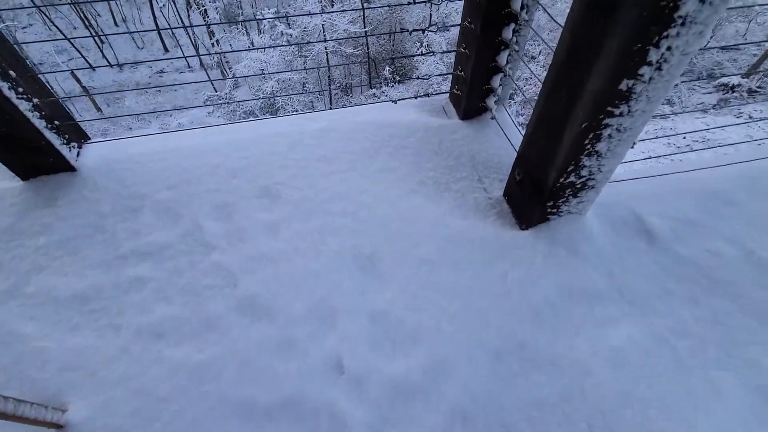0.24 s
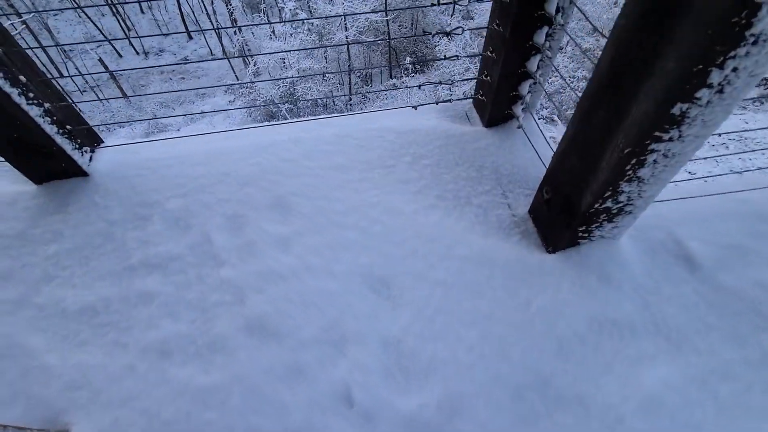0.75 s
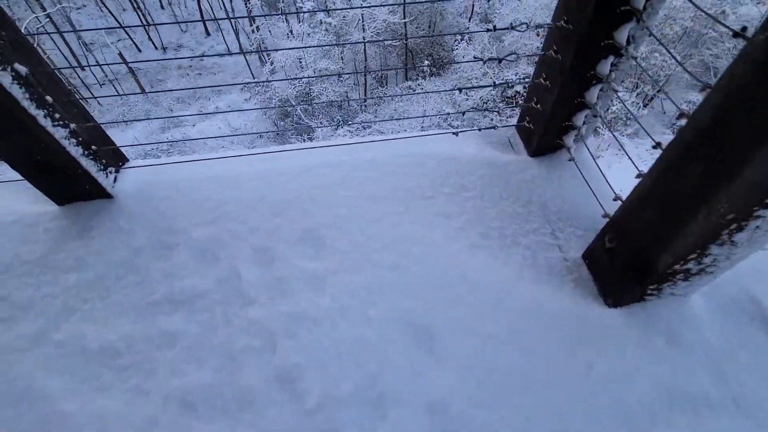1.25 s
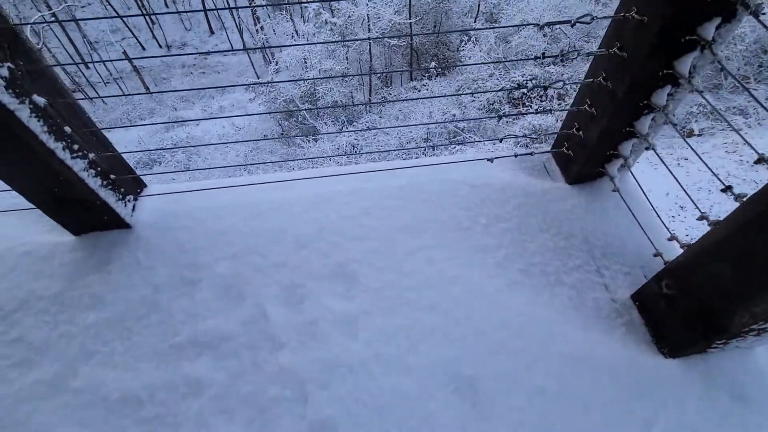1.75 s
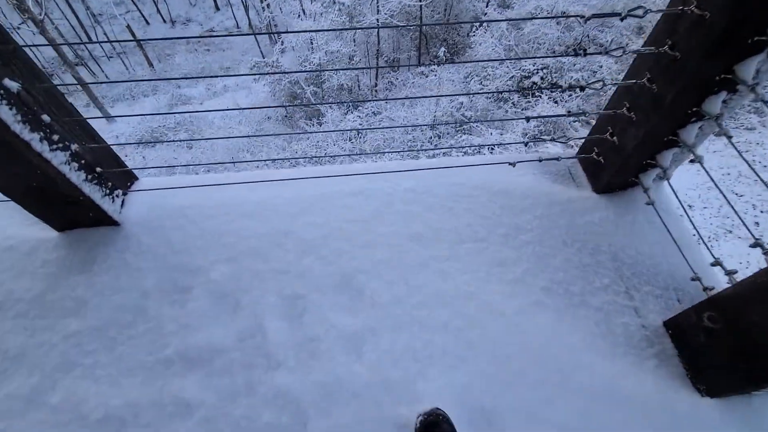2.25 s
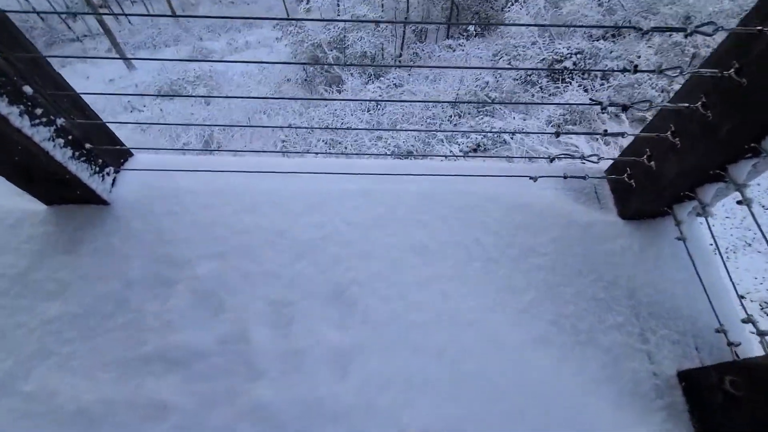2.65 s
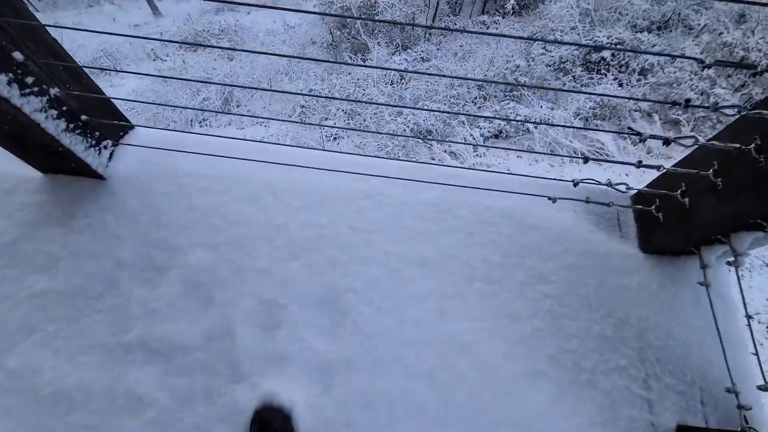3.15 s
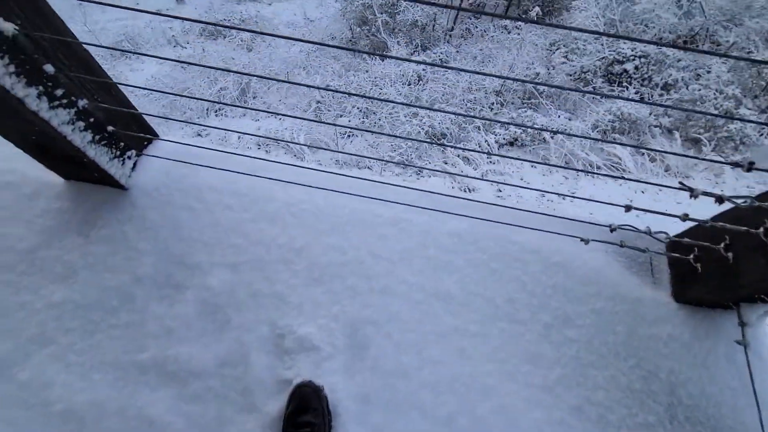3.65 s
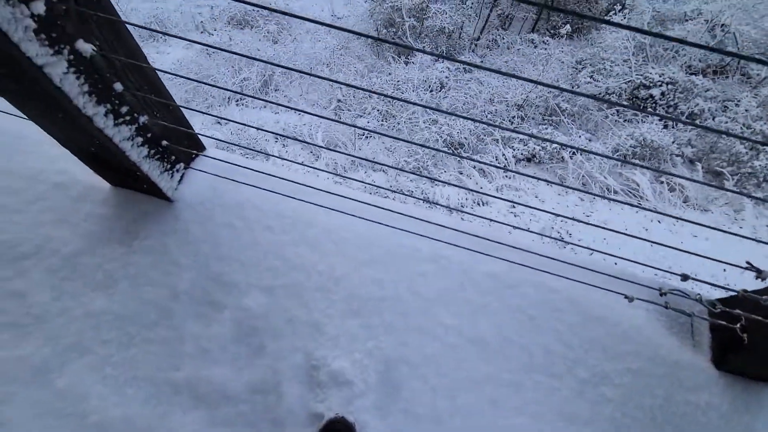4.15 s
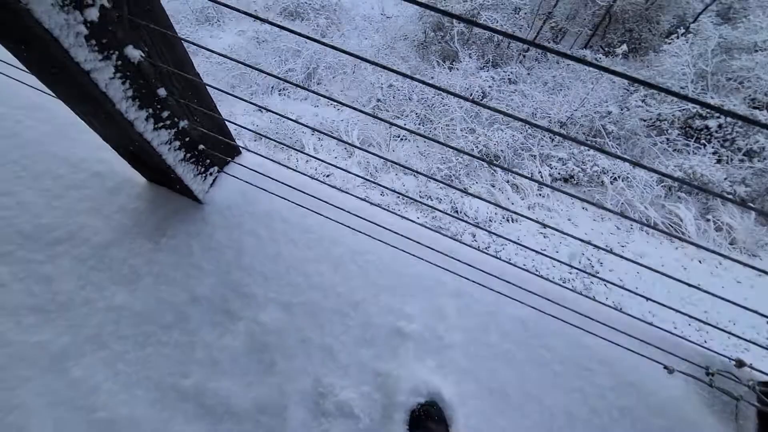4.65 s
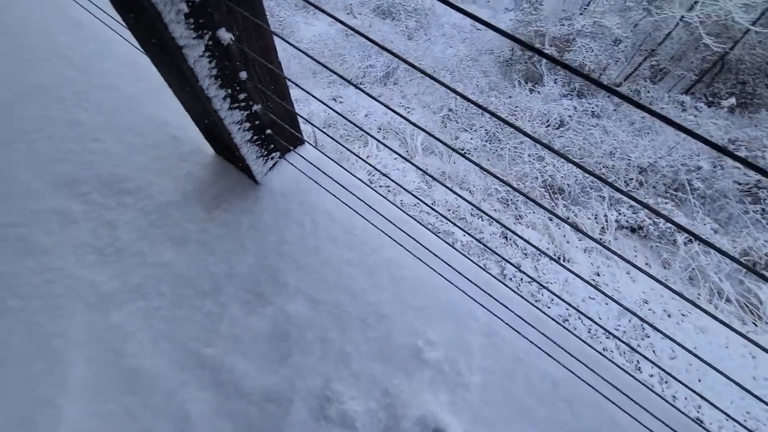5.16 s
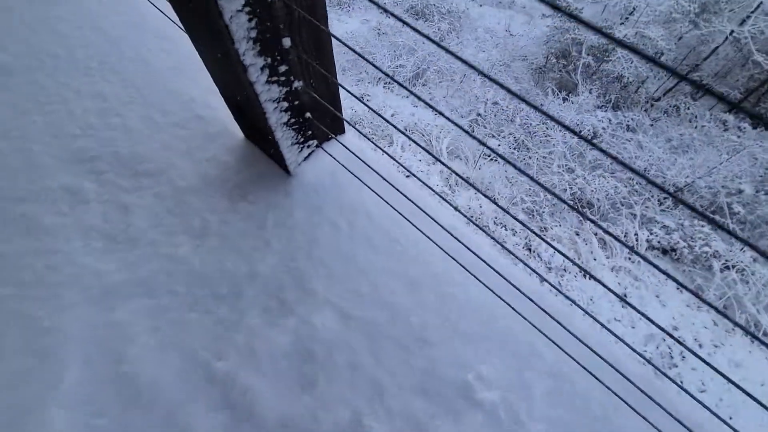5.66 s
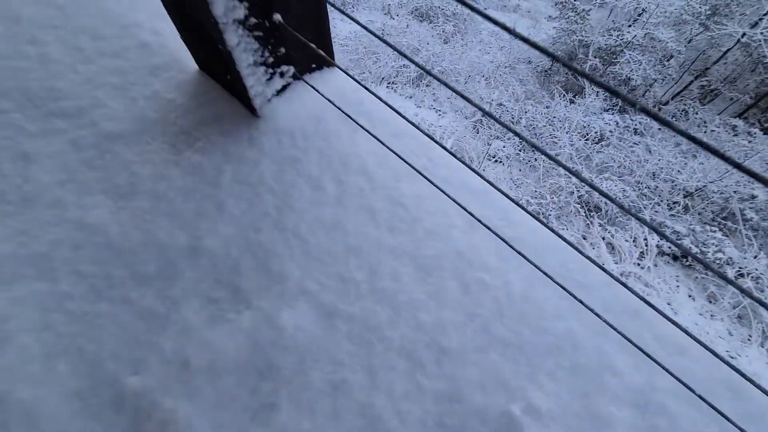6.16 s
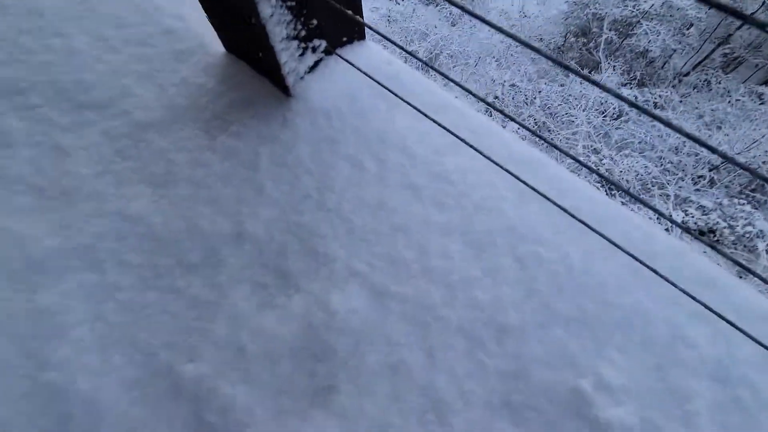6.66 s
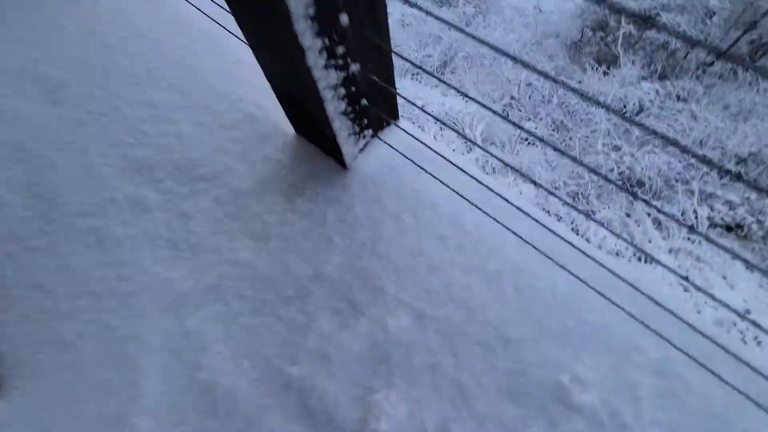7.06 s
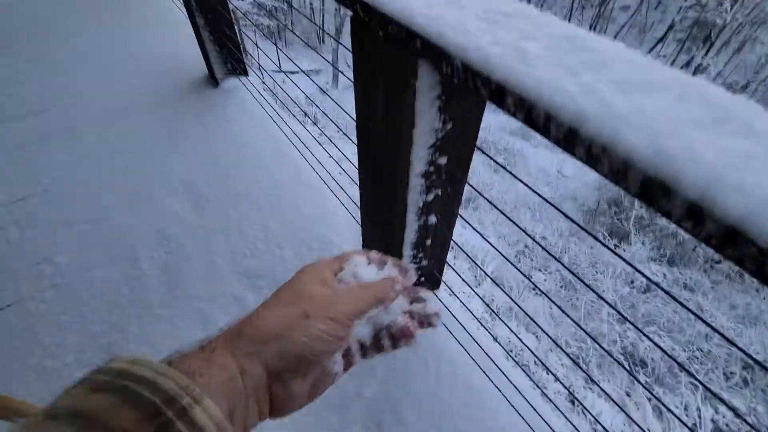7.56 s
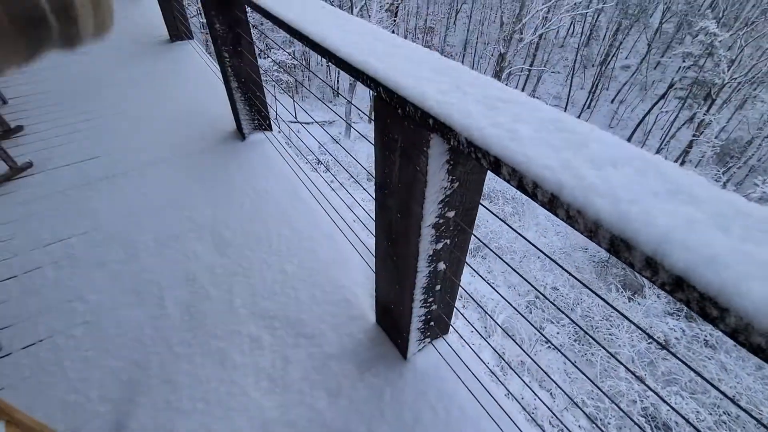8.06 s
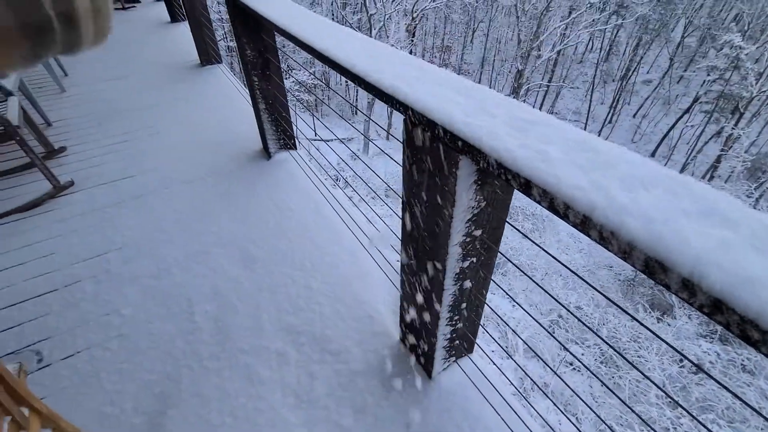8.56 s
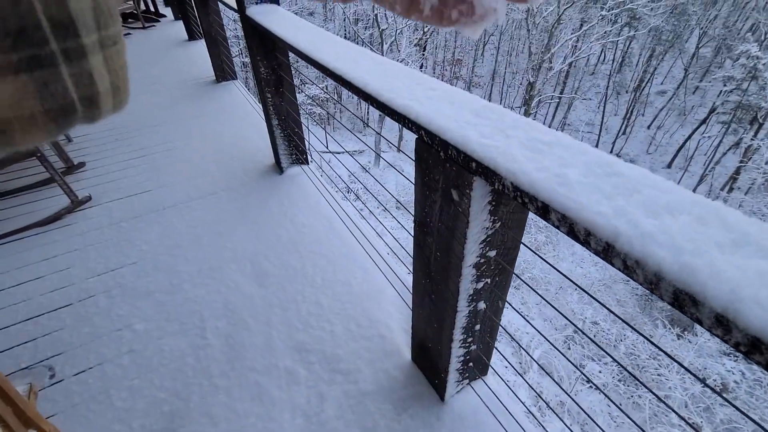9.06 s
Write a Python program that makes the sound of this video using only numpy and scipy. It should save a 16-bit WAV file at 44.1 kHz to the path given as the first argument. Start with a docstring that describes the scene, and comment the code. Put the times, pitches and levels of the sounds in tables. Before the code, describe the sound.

Close, first-person crunching of slow steps in dry powder on a covered wooden deck: clusters of dull, falling knocks, crisp snaps and tiny creaks, with cloth swish, faint board groans and soft thuds. The steps grow heaviest around the middle, then a hand packs snow and a few lumps pat down. A low distant hum and wind rumble against the handheld stereo microphone lie beneath.

```python
"""Powder snow underfoot and in the hand

Slow steps in fresh powder on a wooden deck, then a bare hand scoops up snow, squeezes it and lets lumps fall.
Packing snow gives way in dull falling knocks with short snaps, over a creak of tiny slips; the deck rings on.
Powder and clothing swish as shaped noise, with a few bright ticks and thuds of weight on the boards.
Low noise buffets the microphone and a far machine hums in sine partials, strongest at 120 Hz."""
import sys
import numpy as np
from scipy import signal
from scipy.fft import rfft, irfft, next_fast_len
from scipy.io import wavfile
from scipy.ndimage import uniform_filter1d

SR = 44100
rng = np.random.default_rng(int(sys.argv[2]) if len(sys.argv) > 2 else 0)


def materialize(psi):
    """Save the field psi as 16-bit PCM at rate SR to the path in sys.argv[1].

    A 1-D psi becomes a single channel; in a 2-D psi each row is a channel.
    """
    bounded = np.clip(np.atleast_2d(psi).T, -1, 1)
    quanta = np.round(bounded * 32767).astype(np.int16)
    wavfile.write(sys.argv[1], SR, quanta)


N = 411432
TIME = np.arange(N) / SR

# Levels in the tables are relative: each layer adds its own trim.
# snow gives way with a distinct crack:
# (time [s], body level [dB], body pitch before the start ratio [Hz], snap level [dB])
CRACKS = [(0.0113, -27.5, 457, -25), (0.079, -36, 600, -37), (0.1112, -24, 720, -24.5),
          (0.2031, -21, 465, -27), (0.2266, -21, 563, -34), (0.2575, -31, 560, -42),
          (0.2913, -22, 563, -29), (0.3101, -16, 486, -30.5), (0.3405, -19, 685, -32),
          (0.382, -36, 534, -38), (0.403, -33, 460, -39), (0.4889, -20.5, 570, -25.5),
          (0.623, -28.5, 470, -38.5), (0.6466, -22, 640, -32.5), (1.0948, -22, 568.4, -36.5),
          (1.12, -18, 477, -26), (1.144, -19, 670, -33), (1.157, -18, 590, -31), (1.171, -30, 580, -43),
          (1.186, -22.5, 710, -31), (1.206, -26, 476, -31.5), (1.227, -19, 730, -24),
          (1.2422, -23, 400, -30.5), (1.2672, -12.5, 580, -25.5), (1.3057, -21, 455, -34),
          (1.336, -19.5, 700, -32), (1.382, -19.5, 580, -29), (1.4133, -18.5, 661.5, -29),
          (1.4345, -22, 570, -29), (1.4525, -27, 560, -29.5), (1.4625, -21, 600, -26),
          (1.479, -31, 600, -28), (1.4833, -14, 600, -33), (1.4945, -35, 600, -27),
          (1.508, -20, 652, -25.5), (1.5164, -33, 600, -31), (1.522, -30, 607, -30), (1.531, -27, 600, -25),
          (1.536, -21.5, 490, -27), (1.5426, -15.5, 580, -30), (1.6037, -10.5, 470, -20.5),
          (1.6432, -20, 490, -28), (1.677, -20.5, 547, -28), (2.1384, -20, 487, -31),
          (2.2984, -27, 505, -33), (2.347, -20, 448.7, -47), (2.3793, -22.5, 469.6, -36.5),
          (2.4164, -19, 473, -33), (2.4335, -18.5, 455, -33), (2.4608, -22, 463, -36),
          (2.519, -16.5, 450, -31), (2.5314, -20, 443, -28.5), (2.5451, -20.5, 487, -33),
          (2.5656, -18.5, 412, -31), (2.5908, -13.5, 549, -23.5), (2.6071, -19, 550, -25.5),
          (2.636, -17, 445, -44), (2.6506, -18.5, 490, -30.5), (2.6632, -29, 380, -45),
          (2.6857, -22.5, 358, -27), (2.705, -18.5, 459, -27), (2.7221, -25.5, 514, -28.5),
          (2.759, -24, 463, -24), (2.7645, -11.5, 480, -22), (2.8386, -9.5, 582, -26),
          (2.8442, -17.5, 420, -24), (3.4219, -14, 583, -26), (3.4903, -38, 550, -43),
          (3.571, -21.5, 550, -36), (3.634, -15, 545, -28), (3.6951, -9, 560, -23), (3.7125, -31, 500, -34),
          (3.8081, -11.5, 498, -25.5), (3.851, -18, 661, -31), (3.87, -23, 710, -35),
          (3.8946, -14, 584, -27), (3.9307, -16, 613, -28.5), (3.946, -26, 559, -43),
          (3.9655, -23.5, 569, -39), (3.973, -23, 595, -35), (3.9762, -21, 565, -34),
          (3.987, -19, 504, -30.5), (4.007, -19, 624, -32), (4.0183, -8.5, 503, -25),
          (4.0286, -21, 600, -34), (4.046, -16, 745, -36), (4.0684, -16.5, 500, -26.5),
          (4.0778, -22, 520, -32), (4.0885, -29, 560, -34), (4.0942, -25, 569, -29),
          (4.107, -20, 387, -30.5), (4.1243, -7.5, 652, -22), (4.1793, -12, 514, -24.5),
          (4.2391, -18.5, 467, -40), (4.2709, -13.5, 483, -26.5), (4.557, -19.5, 523, -34),
          (4.5874, -12.5, 543, -30.5), (4.6099, -26.5, 459, -32), (4.6264, -29, 460, -29),
          (4.6552, -18, 537, -32), (4.6744, -20.5, 482, -36), (4.6952, -20, 602, -30.5),
          (4.7085, -20.5, 480, -34), (4.735, -12.5, 352, -28.5), (4.7701, -18, 540, -29),
          (4.811, -12.5, 546, -35), (4.8575, -17, 461, -40), (4.883, -10, 522, -25), (4.9132, -9, 480, -30),
          (4.9765, -5.5, 525, -25.5), (5.0016, -33, 459, -53), (5.0728, -14, 358, -24.5),
          (5.108, -24.5, 514, -32), (5.1376, -12.5, 380, -23), (5.1848, -25, 384, -34.5),
          (5.2272, -14.0, 550, -22.5), (5.4292, -23.5, 340, -33), (5.4574, -21.5, 375, -27),
          (5.6134, -19, 487.3, -31), (5.6348, -19, 600, -37), (5.6531, -24, 626, -33),
          (5.6976, -20.5, 610, -32), (5.7322, -23.5, 457, -28), (5.7571, -28.5, 600, -27),
          (5.825, -25.5, 480, -20.5), (5.875, -24, 486, -22.5), (5.9122, -25, 343, -26.5),
          (6.097, -24, 350, -32), (6.1287, -16.5, 637, -27), (6.3208, -18.5, 430, -27.5),
          (6.3351, -18.5, 452, -21), (6.3408, -17.5, 480, -21), (6.3912, -14, 445, -20),
          (6.3955, -18, 380, -27), (6.41, -27, 418, -26.5), (6.61, -48, 501, -47), (6.8799, -41, 513, -43),
          (7.1849, -27, 383, -37), (7.2173, -45, 410, -37), (7.2335, -23, 760, -37),
          (7.2443, -24, 429, -29.5), (7.265, -24.5, 410, -29.5), (7.39, -40.5, 516, -37),
          (7.5008, -22.5, 547, -29)]
# a boot or the hand presses snow together: (start [s], bearing down [s], easing [s], creak level [dB],
# first slip rate [1/s], small crack level [dB], small crack pitch before the start ratio [Hz], snap level [dB])
PRESSES = [(0.13, 0.13, 0.3, -43, 63.4, -31, 526, -40.5), (1.05, 0.1, 0.14, -40.5, 74, -28, 574.6, -35.5),
           (1.43, 0.072, 0.094, -35.5, 117, -25, 613, -30),
           (2.175, 0.038, 0.24, -38.5, 96, -21.5, 457, -38), (2.521, 0.053, 0.3, -43, 78, -31, 500, -41),
           (3.35, 0.018, 0.027, -32.5, 241, -22, 530, -37.5), (3.48, 0.02, 0.068, -44.5, 58, -36, 547, -38),
           (3.96, 0.12, .11, -37.5, 97, -26, 635, -34), (4.199, 0.09, 0.034, -49.5, 64, -40, 514, -64),
           (4.55, 0.082, 0.098, -46.5, 76, -30, 496, -55), (4.77, 0.05, 0.093, -50, 76, -40, 485.6, -59),
           (4.9, .27, .09, -48, 65, -41.5, 464.3, -49.5), (5.36, 0.062, 0.051, -44.5, 63, -52, 397, -44),
           (5.584, 0.016, 0.11, -38, 183, -19.5, 680, -37), (5.731, 0.018, 0.23, -53, 65, -51, 525, -40.5),
           (6.41, 0.057, 0.09, -53, 110, -40.5, 428.6, -39),
           (7.035, 0.011, 0.046, -44.5, 177, -36.5, 551.6, -40), (7.2, 0.035, .025, -43, 70, -49, 600, -39),
           (7.499, 0.0077, 0.059, -43.5, 51.6, -48.5, 601, -41.5),
           (7.945, 0.029, 0.12, -47.5, 67, -35.5, 475.2, -47),
           (8.291, 0.067, 0.026, -53, 59, -38, 399, -55), (9.25, 0.044, 0.026, -56, 64, -56, 600, -67)]
# a loose lump lands and falls apart:
# (time [s], body level [dB], body pitch before the start ratio [Hz], snap level [dB])
LUMPS = [(7.9305, -25.5, 852.7, -25.5), (7.975, -24.5, 645, -34), (8.0181, -30, 500.5, -34.5),
         (8.0596, -42, 579, -41.5), (8.095, -50, 414.4, -52), (8.2641, -38.5, 570, -45),
         (8.3065, -25.5, 550, -33), (8.334, -27.5, 381, -38.5), (9.2449, -37, 650, -37),
         (9.2752, -33.5, 499, -40)]
# loudness of the far machine: (time [s], level [dB])
HUM_LEVEL = [(0, -40), (1.8, -46), (3.8, -42), (5.5, -39), (6.6, -38), (7.2, -38), (7.7, -44), (8.3, -47.5),
             (8.8, -49), (9.33, -46)]


def from_db(db):
    """Decibels to gain."""
    return 10 ** (np.asarray(db) / 20)


def rms_one(x):
    """Scale to unit power."""
    return x / np.sqrt(np.mean(x ** 2) + 1e-20)


def level_curve(rows):
    """A (time, level) table as a gain at every sample."""
    seconds, db = np.transpose(rows)
    return from_db(np.interp(TIME, seconds, db))


def panned(pan_db):
    """Left and right gains; positive leans left."""
    return from_db([[pan_db / 2], [-pan_db / 2]])


def add(out, s, sound):
    """Mix a short sound in at a time."""
    at = int(np.clip(s * SR, 0, N - 1))
    out[..., at:at + sound.shape[-1]] += sound[..., :N - at]


def stereo_noise(alike, size=N):
    """White noise with a given likeness between left and right."""
    alike = np.clip(alike, -1, 1)
    mid, side = rng.standard_normal((2, size))
    return (np.sqrt(1 + alike) * mid + np.sqrt(1 - alike) * side * [[1], [-1]]) / np.sqrt(2)


def drift(rate):
    """A smooth random wander of spread 1, with a new target rate times per second."""
    knots = rng.standard_normal(int(N / SR * rate) + 2)
    return rms_one(np.interp(TIME * rate, np.arange(len(knots)), knots))


def coloured(spectrum, alike, grain_db=0.0, grains_per_s=1500):
    """Stereo noise with a given spectrum, smooth or broken into grains; rms 1."""
    hz, db = np.transpose(spectrum)
    size = next_fast_len(N)
    f = np.maximum(np.arange(size // 2 + 1) * SR / size, 1)
    shape = from_db(np.interp(np.log(f), np.log(hz), db))
    shape = shape * np.minimum(f / hz[0], 1) ** 2  # fades out below the first point
    grains = stereo_noise(alike) * from_db(grain_db * np.minimum(drift(grains_per_s), 2.5))
    return rms_one(irfft(rfft(grains, size) * shape, size)[:, :N])


def pulse(hz, cycles, size=4096, build=1.25, sag_cycles=1e4):
    """A swing that builds to height 1 over some cycles, then dies; pitch falls to 1/e every sag_cycles."""
    turn = sag_cycles * np.log1p(hz * TIME[:size] / sag_cycles)
    envelope = (turn / cycles * np.exp(1 - turn / cycles)) ** build
    return np.sin(2 * np.pi * turn) * envelope


def catching(per_s, depth_db):
    """Uneven gain of a slide that keeps catching and letting go; rms 1."""
    return rms_one(from_db(depth_db * np.clip(drift(per_s), -2, 2)))


def effort(start, rise_s, fall_s, sag_db, attack_s, release_s):
    """Gain of one movement: it sets in, grows to its peak, eases by the same amount and dies away."""
    age = TIME - start
    held_db = np.interp(age, [0, rise_s, rise_s + fall_s], [-sag_db, 0, -sag_db])
    outside = np.maximum(-age, 0) / attack_s + np.maximum(age - rise_s - fall_s, 0) / release_s
    return from_db(held_db) * np.exp(-np.minimum(outside, 20))


def load(sag_db=6.0, attack_s=0.036, release_s=0.069):
    """How strongly the snow creaks under all the presses."""
    return sum(from_db(db) * effort(start, rise_s, fall_s, sag_db, attack_s, release_s)
               for start, rise_s, fall_s, db, *_ in PRESSES)


def small_cracks(slowing=0.37, uneven=0.252, spread_db=3.5, sag_db=5.5, octaves=0.26, clear_s=0.005, count=40):
    """Thin layers fail in turn under each press, ever more slowly as the snow packs; rows as in CRACKS."""
    rows, big_s, turn = [], np.array(CRACKS)[:, 0], np.arange(count)
    lucks = rng.uniform(-1, 1, (len(PRESSES), count, 4))
    for (start, rise_s, fall_s, _, per_s, db, hz, crisp_db), luck in zip(PRESSES, lucks):
        length = rise_s + fall_s
        age = (turn + .5 + uneven * luck[:, 0]) / per_s
        age = age * (1 + slowing / 2 * age / length)
        force_db = np.interp(age, [0, rise_s, length], [-sag_db, 0, -sag_db]) + spread_db * luck[:, 1]
        pitch = hz * 2 ** (octaves * luck[:, 2])
        snap_db = crisp_db + force_db + spread_db * luck[:, 3]
        run = np.transpose([start + age, db + force_db, pitch, snap_db])
        # leave room around a big crack
        clear = np.abs(run[:, :1] - big_s).min(axis=1) > clear_s
        rows += list(run[clear & (age < length)])
    return rows


def cracks(collapses, body_db=-4.0, body_cycles=1.16, start_ratio=2.058, sag_cycles=2.405,
           length_octaves=0.34, snap_db=-1.0, snap_hz=1330, snap_cycles=1.25, snap_octaves=0.29,
           after_db=-10.5, after_s=0.003703, pan_db=-2.5, snap_pan_db=-5.5, wander_db=2.5,
           left_late_s=.0001, late_spread_s=.0002):
    """Snow collapses: a knock that falls in pitch, as the boards carry lows slower; a snap and an after-slip."""
    out = np.zeros((2, N))
    for (s, db, hz, crisp_db), luck in zip(collapses, rng.uniform(-1.12, 1, (len(collapses), 6))):
        knock = pulse(np.clip(hz, 220, 950) * start_ratio, body_cycles * 2 ** (length_octaves * luck[2]),
                      sag_cycles=sag_cycles * 2 ** (.4 * luck[4]))
        # the knock comes from a little to the right and usually reaches the left port later
        t, late_s = TIME[:len(knock)], left_late_s + late_spread_s * luck[1]
        knock = np.array([np.interp(t - max(side * late_s, 0), t, knock) for side in (1, -1)])
        body = from_db(db + body_db) * knock * panned(pan_db)
        # the snap reaches each port with a slightly different colour
        snap = np.array([pulse(snap_hz * 2 ** (snap_octaves * luck[0] + 0.2 * own), snap_cycles)
                         for own in luck[1:3]])
        snap = from_db(crisp_db + snap_db) * snap * panned(snap_pan_db)
        slip = (body + snap) * panned(wander_db * luck[5])
        add(out, s, slip)
        after_slip = from_db(after_db) * slip * panned(9 * luck[4])
        add(out, s + after_s * (1 + 0.56 * luck[3]), after_slip)
    return out


def crumbling(collapses, level_db=-19.5, decay_s=0.014, size=6000):
    """Level of the loose crumbs that keep settling after each collapse."""
    level = np.zeros(N)
    for s, _, _, crisp_db in collapses:
        add(level, s, from_db(crisp_db + level_db) * np.exp(-TIME[:size] / decay_s))
    return level


def creak(collapses, level_db=-4.0, slips_per_s=175, spread_db=4.5, cycles=0.87, tilt_db=-18.0,
          scatter_db=7.0, pan_db=-2.5, even_s=0.026, count=8):
    """Tiny uneven slips follow each other under load; each rings briefly at several pitches."""
    at = np.cumsum(rng.gamma(6, 1 / 6, 6000) * SR / slips_per_s).astype(int)
    at = at[at < N]
    sizes = from_db(spread_db * np.clip(rng.standard_normal(len(at)), -2, 2))
    out = np.zeros((2, N))
    for hz in np.geomspace(370, 2000, count):
        clicks = np.zeros((2, N))
        scatter = from_db(scatter_db * rng.standard_normal((2, len(at))))
        clicks[:, at] = sizes * rng.normal(0.95, 1, len(at)) * scatter
        grain = pulse(hz, cycles, size=1024) * np.sqrt(hz) * from_db(tilt_db * np.log2(max(hz, 700)))
        out += signal.oaconvolve(clicks, grain[None], axes=1)[:, :N]
    # a steady load releases energy at a steady rate
    out = rms_one(out)
    out = out / np.sqrt(uniform_filter1d(np.mean(out ** 2, axis=0), int(even_s * SR)) + 0.034)
    return out * (load() * from_db(level_db) + crumbling(collapses)) * panned(pan_db)


def muffled(x, cut_hz=1750, leak_db=-35.5):
    """The snow pack rings broadly and swallows most of the treble."""
    # broad resonances of the snow pack: (frequency [Hz], width [Hz], level [dB])
    pack = [(389, 80, -10.5), (762, 150, -6), (1275, 344, -3.5)]
    for hz, width, db in pack:
        x = x + from_db(db) * signal.lfilter(*signal.iirpeak(hz, hz / width, fs=SR), x)
    lows = signal.sosfilt(signal.butter(8, cut_hz, fs=SR, output="sos"), x)
    highs = signal.sosfilt(signal.butter(2, cut_hz, "high", fs=SR, output="sos"), x)
    return lows + from_db(leak_db) * highs


def grit(collapses, level_db=-12.5, follow=1.0, usual_swell_s=0.0014, shorter_per_db=0.05, usual_db=-30,
         crackle_db=-28.0):
    """Each collapse breaks a spray of crystals, shorter after a strong snap; crystals crackle in between."""
    # spectrum of breaking crystals: (frequency [Hz], density [dB])
    grit_colour = [(800, 3.5), (1600, 8), (2200, 2.5), (2900, 0.5), (4500, -13), (8000, -19.5),
                   (15500, -34)]
    spray = np.zeros(N)
    for s, _, _, crisp_db in collapses:
        extra_db = crisp_db - usual_db
        swell_s = usual_swell_s * np.exp(-shorter_per_db * extra_db)
        age = TIME[:2048] / swell_s
        add(spray, s, from_db(usual_db + follow * extra_db + level_db) * age * np.exp(1 - age))
    crackle = from_db(crackle_db) * load() * catching(per_s=460, depth_db=12.5)
    return (spray + crackle) * coloured(grit_colour, alike=0.049, grain_db=3.5)


def pats():
    """A loose lump lands with a shorter, brighter pat than packed snow."""
    return cracks(LUMPS, body_db=-2.0, body_cycles=.8, start_ratio=1.9, snap_db=4.0, snap_hz=1500,
                  snap_cycles=.7, snap_octaves=.08, after_db=-15.0)


def crumbs(level_db=-15.0, decay_s=.02, splash_db=8.0, splash_s=0.0017, size=8000):
    """A landed lump bursts softly and its crumbs patter on the powder."""
    # spectrum of a lump's crumbs: (frequency [Hz], density [dB])
    crumb_colour = [(500, 4), (1000, 9.5), (1600, -4.5), (2000, -20), (2700, -15), (3600, -37),
                    (12000, -41)]
    level, t = np.zeros(N), TIME[:size]
    patter = np.exp(-t / decay_s)
    splash = from_db(splash_db) * t / splash_s * np.exp(1 - t / splash_s)
    for s, _, _, crisp_db in LUMPS:
        add(level, s, from_db(crisp_db + level_db) * (patter + splash))
    return level * coloured(crumb_colour, alike=0.18, grain_db=4.0)


def friction(strokes, width_hz, alike, edge_s):
    """Stick and slip drives one rough resonance, whose pitch glides as the load changes."""
    out, smooth = np.zeros((2, N)), signal.butter(2, width_hz, fs=SR, output="sos")
    for s, length, db, first_hz, last_hz in strokes:
        t = TIME[:int(max(length, .02) * SR)]
        phase = 2 * np.pi * np.cumsum(np.linspace(first_hz, last_hz, len(t))) / SR
        rough = stereo_noise(alike, size=len(t)) + 1j * stereo_noise(alike, size=len(t))
        rough = signal.sosfilt(smooth, rough)
        stroke = np.minimum(np.minimum(t, t[-1] - t) / edge_s, 1)
        add(out, s, from_db(db) * stroke * rms_one(np.real(rough * np.exp(1j * phase))))
    return out


def squeaks():
    """Snow rubbed until it squeaks in a narrow gliding band that catches and lets go."""
    # (start [s], length [s], level [dB], first pitch [Hz], last pitch [Hz])
    rubs = [(0.464, 0.074, -52, 1227, 1400), (1.535, .06, -44, 1347, 1340), (2.112, 0.035, -46, 1196, 1477),
            (2.755, 0.065, -36.5, 1262, 1367), (3.352, 0.047, -35, 683, 857),
            (4.485, 0.07, -50, 1400, 1330), (5.581, 0.089, -40, 714, 782),
            (6.516, 0.049, -39.5, 1072, 1147), (7.035, 0.12, -44, 1200, 1353)]
    return friction(rubs, width_hz=180, alike=0.67, edge_s=0.0057) * catching(per_s=110, depth_db=3.5)


def rasps():
    """Dry powder rasps under a sole or between the fingers in a wide, high band."""
    # (start [s], length [s], level [dB], first pitch [Hz], last pitch [Hz])
    rasp_rows = [(2.115, 0.061, -49, 2700, 2895), (5.555, 0.054, -42, 1894, 2214),
                 (6.455, 0.036, -46, 2290, 2770), (7.04, 0.098, -60, 2600, 2980),
                 (7.28, 0.17, -69.5, 2900, 3154), (7.45, 0.24, -74, 3260, 3295)]
    return friction(rasp_rows, width_hz=550, alike=.1, edge_s=0.018) * catching(per_s=510, depth_db=1.0)


def deck(x, wet_db=-2.5, alike_hz=800, build_s=0.0013):
    """Boards and rails store each slip's energy and ring on, lows most alike at both ports."""
    # ring of the deck: (frequency [Hz], level [dB], time to fall by 60 dB [s])
    deck_bands = [(221, -1, 0.33), (378, -6, 0.16), (780, -11, 0.024), (1240, -16.5, 0.18),
                  (2848, -14.5, 0.07)]
    out, rise = x, np.exp(-1 / (build_s * SR))
    for hz, db, t60 in deck_bands:
        band = signal.butter(2, [hz / np.sqrt(2), hz * np.sqrt(2)], "band", fs=SR, output="sos")
        keep = np.exp(-np.log(1e6) / (t60 * SR))  # share of energy left after one sample
        fed = np.mean(signal.sosfilt(band, x) ** 2, axis=0) + 1e-18
        stored = signal.lfilter([(1 - keep) * (1 - rise)], np.poly([keep, rise]), fed)
        ringing = rms_one(signal.sosfilt(band, stereo_noise(1 / (1 + (hz / alike_hz) ** 2))))
        out = out + from_db(db + wet_db) * np.sqrt(np.abs(stored)) * ringing
    return out


def groans():
    """Deck boards groan under the shifting weight in a narrow gliding band."""
    # (start [s], length [s], level [dB], first pitch [Hz], last pitch [Hz])
    groan_rows = [(3.07, 0.18, -42.5, 229.6, 196), (3.38, 0.13, -31, 263, 171.6),
                  (4.28, 0.12, -44, 554, 484), (5.14, 0.18, -37, 303.3, 258),
                  (5.41, 0.085, -39, 290, 273.4), (6.32, 0.076, -57, 375, 374),
                  (6.44, 0.15, -39.5, 377.5, 353)]
    return friction(groan_rows, width_hz=38.5, alike=0.65, edge_s=0.036)


def thuds(level_db=-4.0, cycles=1.0, upper_ratio=1.8, upper_db=-10.5):
    """Weight lands softly on the covered boards and bends them: a low pulse with a fainter upper one."""
    # (time [s], level [dB], pitch [Hz])
    thud_rows = [(2.52, -29, 93.4), (3.422, -19, 121), (5.073, -17, 231), (5.137, -11, 249),
                 (5.975, -26, 94.6), (6.13, -22, 121), (6.3366, -7.5, 387), (6.345, -17.5, 124),
                 (6.38, -18.5, 91.4), (7.955, -37, 230), (8.332, -35, 210), (9.287, -39, 189.3)]
    out = np.zeros((2, N))
    for s, db, hz in thud_rows:
        upper = from_db(upper_db) * pulse(hz * upper_ratio, 2 * cycles)
        add(out, s, from_db(db + level_db) * (pulse(hz, cycles) + upper))
    return out


def swish(brush_db=5.5, hiss_db=0.0, flutter_db=2.0, sag_db=5.5, attack_s=0.031, release_s=0.018):
    """Loose powder and cloth slide in a fluttering hiss that follows the speed of each sweep."""
    # a leg, sleeve or hand sweeps through powder:
    # (start [s], speeding up [s], slowing [s], soft brush level [dB], bright hiss level [dB])
    sweeps = [(0.0, 0.23, .19, -55.5, -84), (0.43, .1, 0.031, -50, -62.5), (1.018, 0.081, 0.22, -53.5, -67),
              (1.439, 0.24, 0.037, -57.5, -67), (2.135, 0.0076, 0.21, -52.5, -78),
              (2.53, 0.21, 0.14, -54.5, -71.5), (3.3, 0.063, 0.032, -49, -62),
              (3.922, 0.26, 0.07, -55, -62.5), (4.251, 0.25, 0.17, -61, -71), (4.801, 0.82, .2, -71, -68),
              (5.563, 0.025, 0.17, -43.5, -54.5), (5.802, 0.35, 0.2, -59, -49),
              (6.328, 0.21, 0.021, -46.5, -43), (6.57, 0.37, 0.18, -68.5, -67.5),
              (7.046, 0.032, 0.08, -49, -56.5), (7.16, 0.063, 0.31, -63.5, -67),
              (7.659, 0.42, 0.11, -78, -73.5), (8.238, 0.079, 0.092, -73, -79)]
    # spectrum of the soft brush: (frequency [Hz], density [dB])
    brush_colour = [(300, 3), (700, 12), (1400, 17), (2100, 4), (3000, 0.5), (4500, -9), (7000, -11.5),
                    (15000, -35.5)]
    # spectrum of the bright hiss: (frequency [Hz], density [dB])
    hiss_colour = [(2000, 1), (4000, -2.5), (6500, -3), (10000, -4), (15500, -2.5)]
    brush, hiss = 0, 0
    for start, rise_s, fall_s, soft_db, bright_db in sweeps:
        speed = effort(start, rise_s, fall_s, sag_db, attack_s, release_s)
        brush = np.maximum(brush, from_db(soft_db) * speed)
        hiss = np.maximum(hiss, from_db(bright_db) * speed)
    soft = from_db(brush_db) * brush * coloured(brush_colour, alike=0.031, grain_db=1.5)
    soft = soft * catching(per_s=160, depth_db=2.5)
    bright = from_db(hiss_db) * hiss * coloured(hiss_colour, alike=0.0)
    return (soft + bright) * from_db(flutter_db * drift(270))


def ticks(level_db=-18.0, decay_s=0.0013, sharpness=12.0, broad_db=-7.0, tail_db=-15.5, tail_s=.012,
          low_share=0.06, size=3072):
    """Something small and hard is touched: a bright burst that leans towards one high pitch."""
    # (time [s], level [dB], pitch [Hz])
    tick_rows = [(1.2289, -20, 7000), (3.5253, -15.5, 13900), (4.128, -24, 6840), (4.186, -19.5, 12840),
                 (5.2261, -32, 7600), (7.364, -42, 13060), (7.4982, -26.5, 8900), (7.748, -36, 12700)]
    out, t = np.zeros((2, N)), TIME[:size]
    shape = t / decay_s * np.exp(1 - t / decay_s) + from_db(tail_db) * np.exp(-t / tail_s)
    for s, db, hz in tick_rows:
        highpass = signal.butter(2, hz * min(low_share, 1), "high", fs=SR, output="sos")
        burst = signal.sosfilt(highpass, stereo_noise(0.19, size=size))
        rings = signal.lfilter(*signal.iirpeak(min(hz, 15000), sharpness, fs=SR), burst)
        rings = rings + from_db(broad_db) * burst
        add(out, s, from_db(db + level_db) * rms_one(rings) * shape)
    return out


def puffs(level_db=0.0, swell_s=0.02, pan_db=11.5, size=8192):
    """A pocket of air swells against mainly the left port and fades in a dull thump."""
    # (time [s], level [dB], upper edge [Hz])
    puff_rows = [(2.006, -21, 160), (2.9, -29.5, 70), (7.03, -35.5, 69), (7.244, -25, 68),
                 (7.725, -47, 70.7)]
    out, age = np.zeros((2, N)), TIME[:size] / swell_s
    swell = (age * np.exp(1 - age)) ** 2
    for s, db, hz in puff_rows:
        band = signal.butter(3, [25, hz], "band", fs=SR, output="sos")
        thump = signal.sosfilt(band, stereo_noise(0, size=2 * size))[:, size:]  # past the filter's start
        add(out, s, from_db(db + level_db) * rms_one(thump) * swell * panned(pan_db))
    return out


def hum(level_db=0.0, waver_db=1.5):
    """A low drone of sine partials, each wavering a little in level."""
    # (frequency [Hz], level [dB])
    hum_partials = [(120.0, -1.5), (146.7, -27.5), (240.0, -24), (359.9, -24), (389.2, -29.5)]
    partials = 0
    for hz, db in hum_partials:
        tone = np.sin(2 * np.pi * (hz * TIME + rng.random()))
        partials = partials + from_db(db + waver_db * drift(2.134)) * tone
    return np.sqrt(2) * from_db(level_db) * level_curve(HUM_LEVEL) * partials


def air(level_db=-3.0, pan_db=1.5, follow=0.45, gust_db=1.87, gusts_per_s=9, still_end_db=-59.5):
    """Lumpy, gusting rumble over each port, above a hush that swells along with the far machine."""
    # air on the microphone: (time [s], level [dB])
    air_level = [(0, -29.5), (0.6, -39), (0.85, -32), (1.05, -27.5), (1.4, -30.5), (1.9, -32.5), (2.2, -33),
                 (2.4, -39), (2.8, -26.5), (3.4, -28), (4.2, -30), (4.8, -39.5), (5.5, -41.5), (6.35, -32),
                 (6.8, -47.5), (7.5, -47), (8.3, -48.5), (9.33, -58)]
    # spectrum of the rumble: (frequency [Hz], density [dB])
    air_colour = [(15, -12), (30, 3), (70, 6), (110, -1.5), (180, -17.5), (300, -36.5), (600, -69.5)]
    # spectrum of the hush: (frequency [Hz], density [dB])
    still_colour = [(140, 9), (200, 3.5), (290, 4), (420, -2.5), (700, -10.5), (1000, -15.5), (1500, -17),
                    (2200, -25), (5000, -35), (6600, -26), (9600, -37.5), (12200, -28.5), (15500, -42)]
    flow = level_curve(air_level) * from_db(level_db + gust_db * drift(gusts_per_s))
    rumble = flow * coloured(air_colour, alike=0.0) * panned(pan_db)
    drone = level_curve(HUM_LEVEL)
    hush_level = from_db(still_end_db) * (drone / drone[-1]) ** follow
    return rumble + hush_level * coloured(still_colour, alike=0.35)


def scene():
    """Everything heard from the hand-held microphone."""
    collapses = list(CRACKS) + small_cracks()
    packed = muffled(cracks(collapses) + pats() + creak(collapses))
    snow = packed + grit(collapses) + crumbs() + squeaks() + rasps()
    return deck(snow) + groans() + thuds() + puffs() + ticks() + swish() + hum() + air()


def record(dry, cutoff_hz=15900):
    """The top is cut steeply."""
    return signal.sosfilt(signal.ellip(10, .1, 70, cutoff_hz, fs=SR, output="sos"), dry)


dry = scene()
out = record(dry)
materialize(out)
```